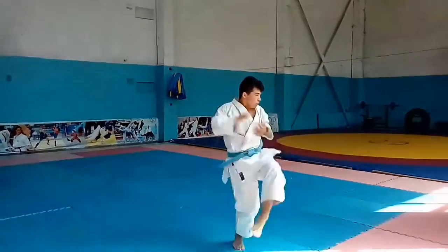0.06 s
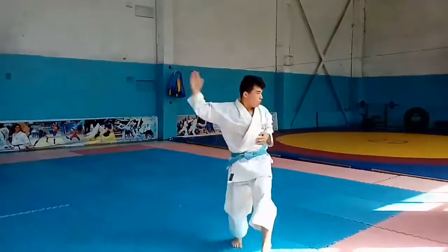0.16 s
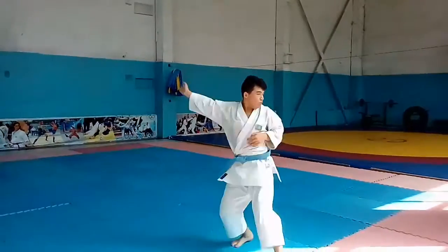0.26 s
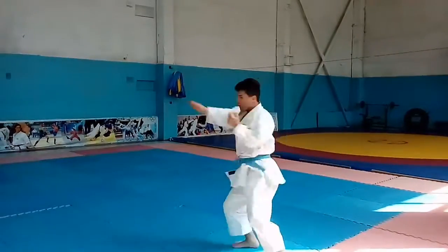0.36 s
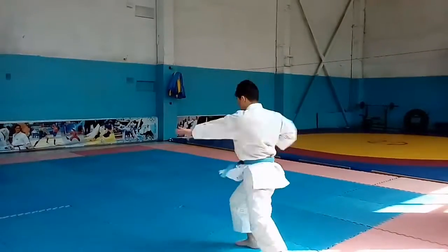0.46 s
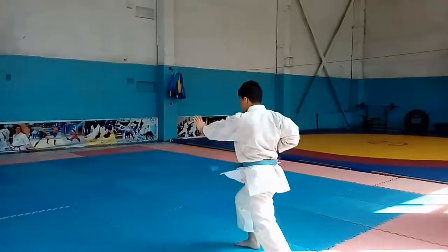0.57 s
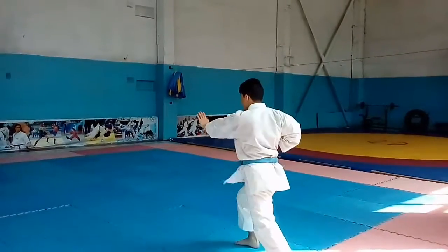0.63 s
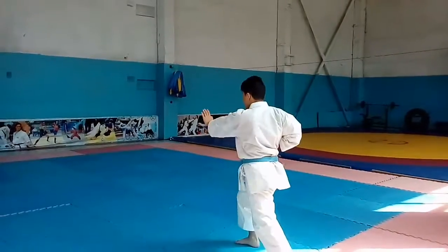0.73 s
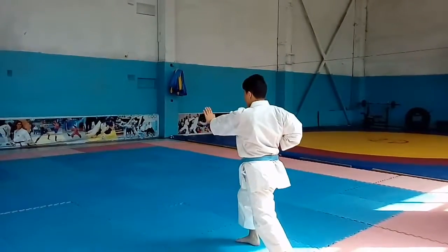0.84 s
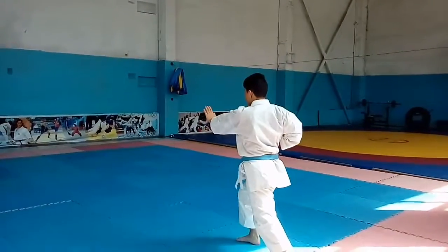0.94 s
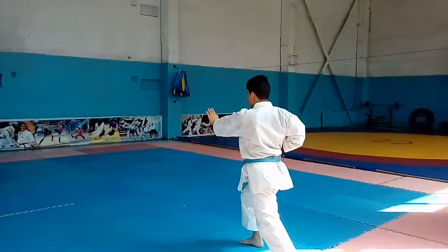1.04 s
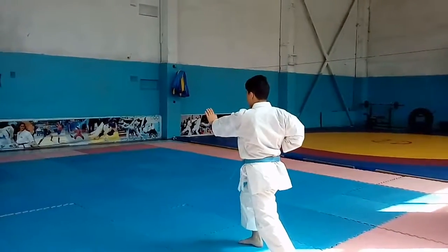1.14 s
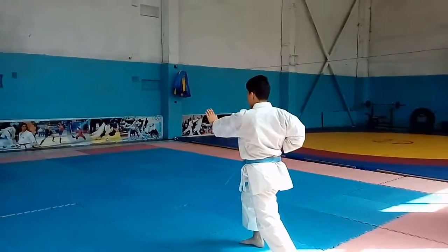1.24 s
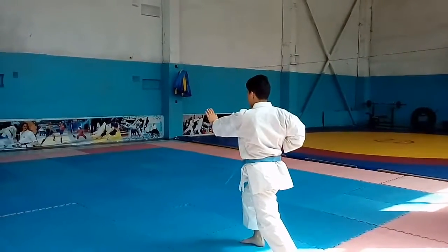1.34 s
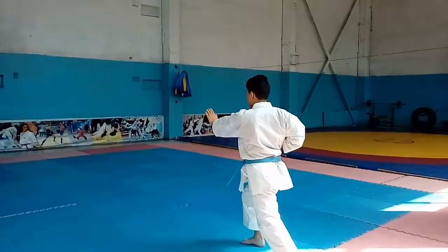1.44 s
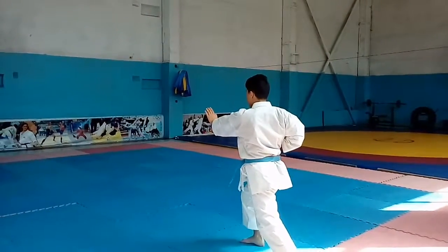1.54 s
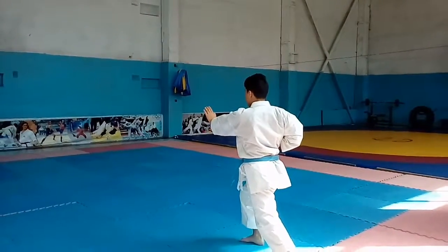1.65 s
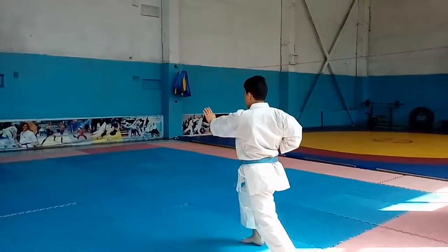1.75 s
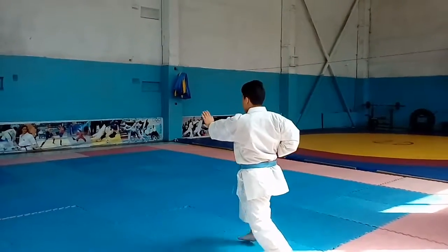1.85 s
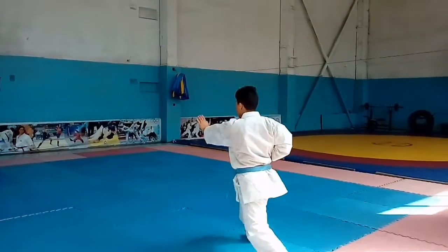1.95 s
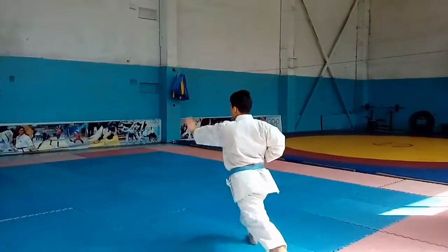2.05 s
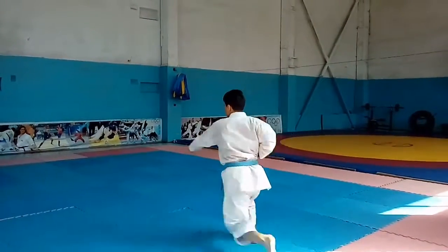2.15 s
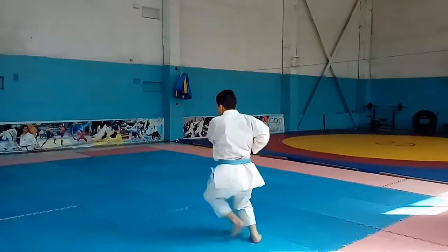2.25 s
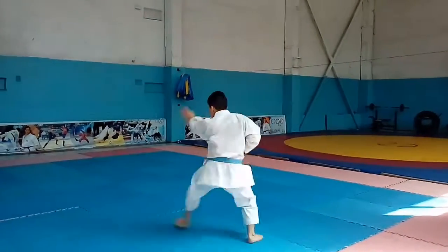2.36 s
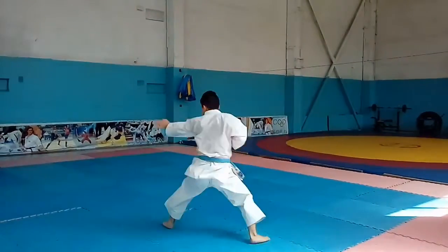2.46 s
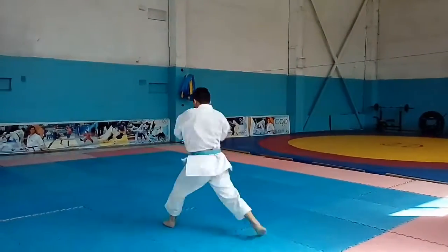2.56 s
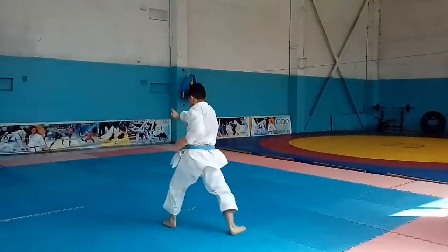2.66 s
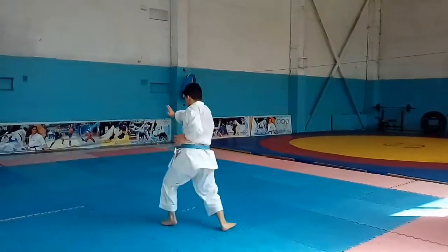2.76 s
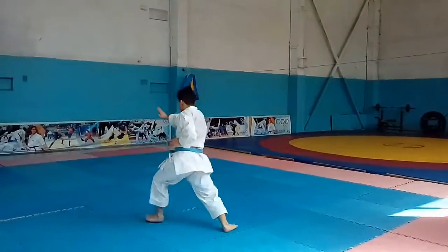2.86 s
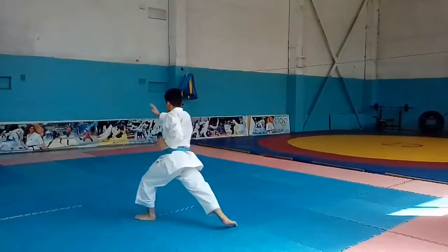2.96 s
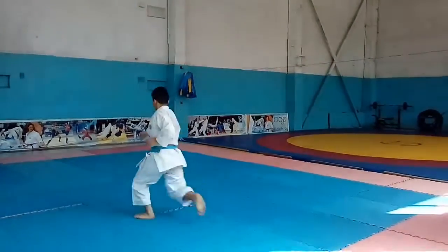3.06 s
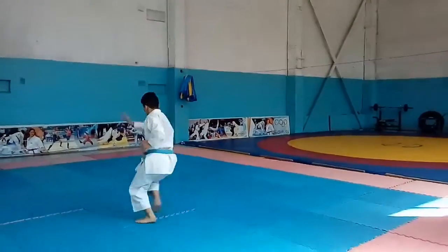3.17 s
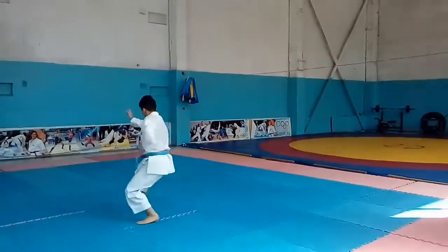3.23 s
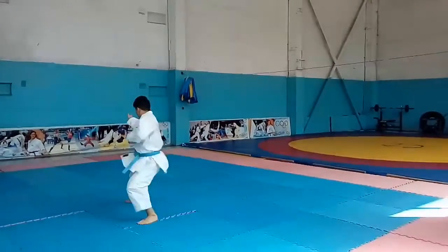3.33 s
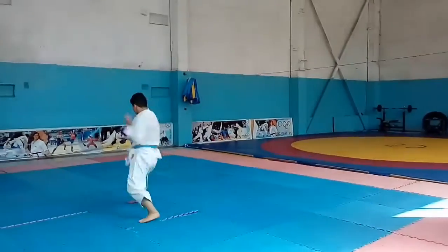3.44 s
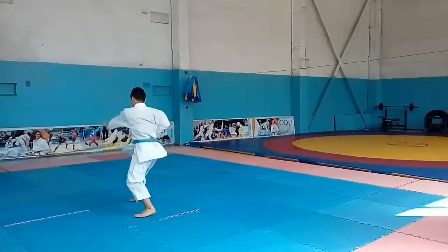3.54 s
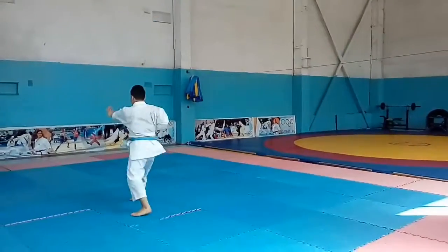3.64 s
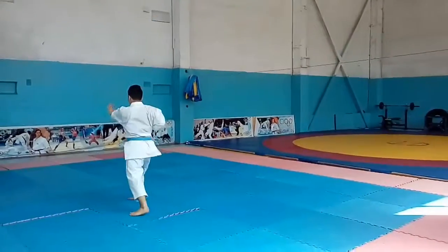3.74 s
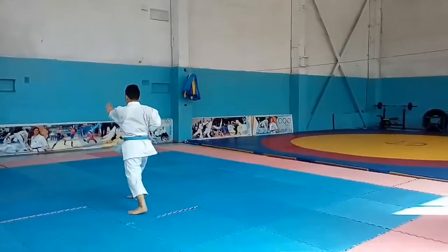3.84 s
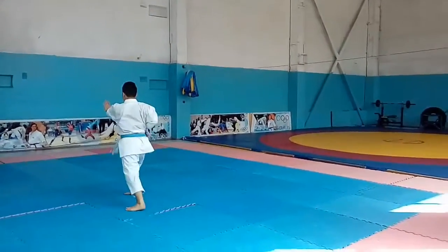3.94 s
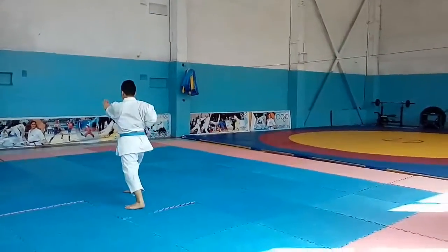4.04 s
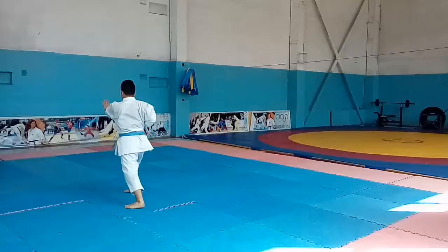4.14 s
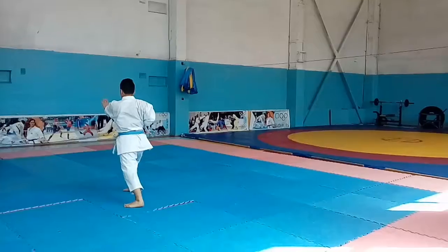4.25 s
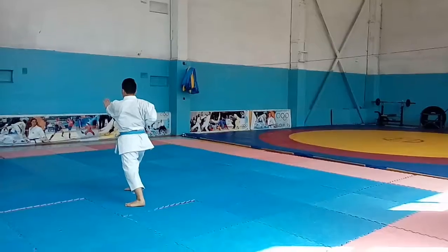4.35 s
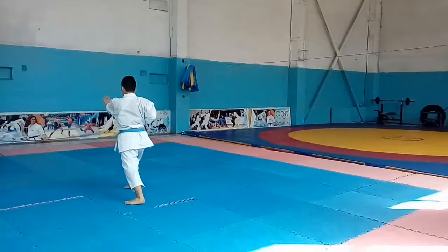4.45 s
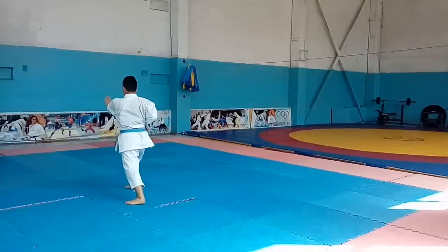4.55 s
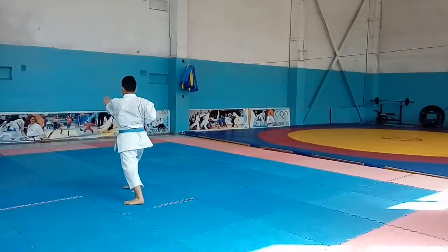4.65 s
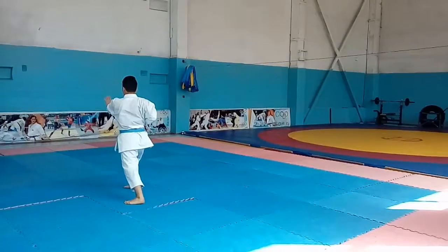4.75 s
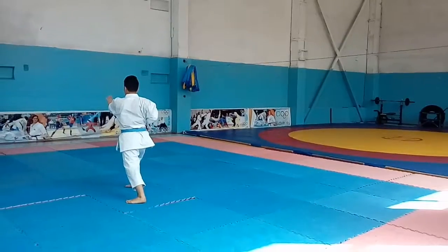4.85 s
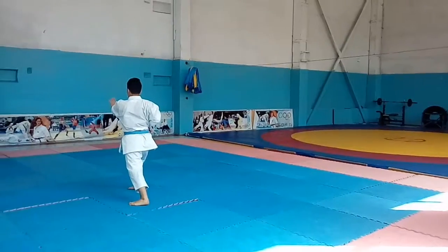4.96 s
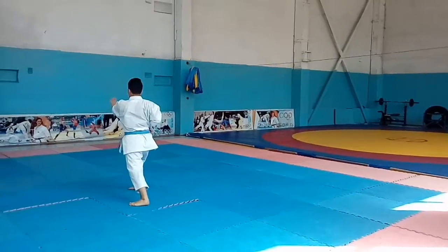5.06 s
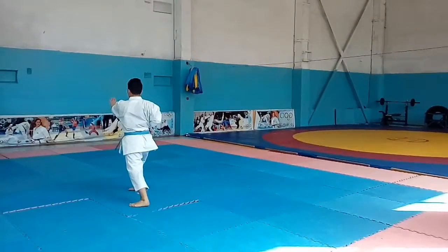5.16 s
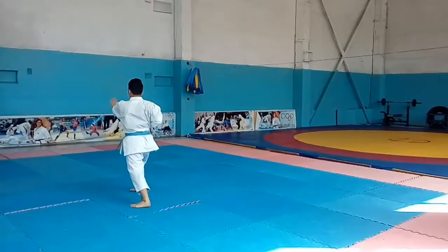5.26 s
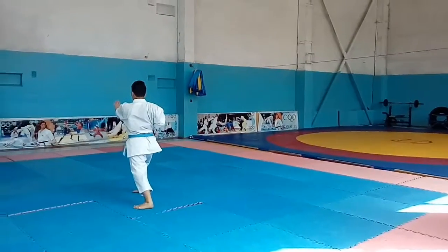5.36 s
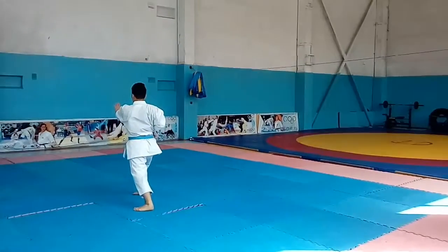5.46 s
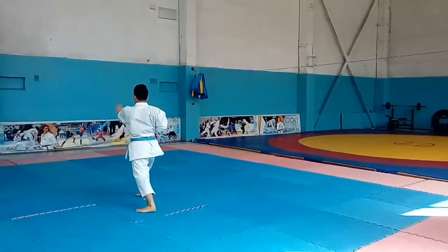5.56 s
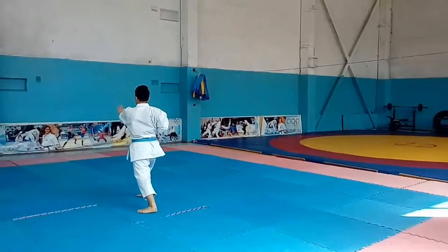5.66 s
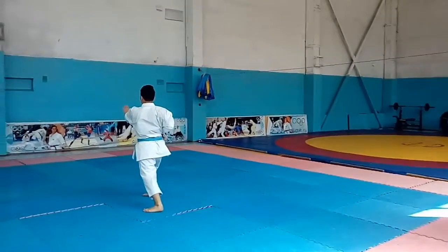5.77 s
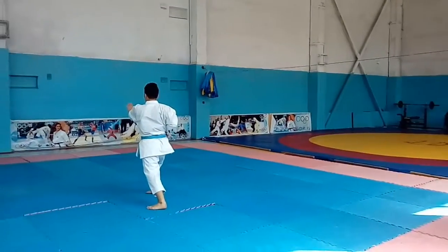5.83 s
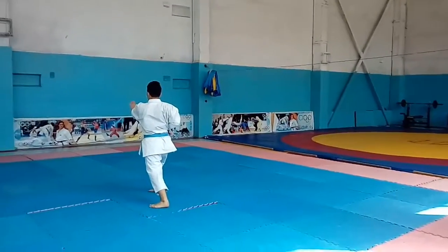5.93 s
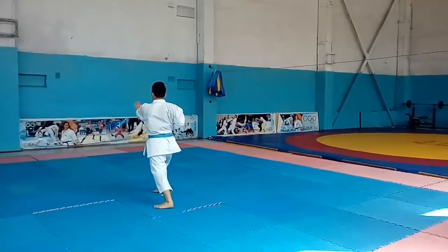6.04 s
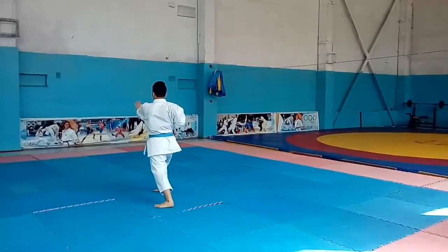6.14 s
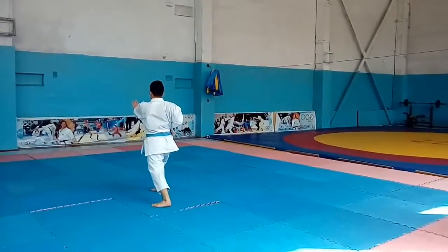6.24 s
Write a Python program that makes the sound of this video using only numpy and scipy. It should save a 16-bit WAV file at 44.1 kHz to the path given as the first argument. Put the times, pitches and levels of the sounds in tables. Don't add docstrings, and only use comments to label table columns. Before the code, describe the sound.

Rapid swishes and sharp fabric snaps, hollow air pops from sleeves and soft booming thuds of bare feet on a sprung mat floor come in three bursts, separated by stillness. Far walls answer every snap after a tiny gap with a tail of a couple of seconds. The ending is nearly quiet, with dry cloth whispers and faint creaks, heard through a small, bass-thin, gently hissing microphone some metres off.

```python
import sys
import numpy as np
from scipy import signal
from scipy.fft import rfft, irfft, next_fast_len
from scipy.io import wavfile
from scipy.ndimage import uniform_filter1d

SR = 44100
rng = np.random.default_rng(int(sys.argv[2]) if len(sys.argv) > 2 else 0)


def put_to_file(sound):
    columns = np.atleast_2d(sound).T
    safe = np.clip(columns, -1, 1)
    whole_steps = np.round(safe * 32767)
    wavfile.write(sys.argv[1], SR, whole_steps.astype(np.int16))


def magnitude_from_level(level_db):
    exponent = np.asarray(level_db, float) / 20
    return 10 ** exponent


N = 277830
LEAD = SR // 2


def evened(x):
    return x / np.sqrt(np.mean(x ** 2) + 1e-20)


def read(points, hz):
    f, value = np.transpose(points)
    return np.interp(np.log(hz + 1), np.log(f + 1), value)


def add(mix, s, sound):
    part = mix[round(s * SR) + LEAD:][:len(sound)]
    part += sound[:len(part)]


def coloured(x, gain_db):
    size = next_fast_len(len(x) + 4096)
    hz = np.fft.rfftfreq(size, 1 / SR)
    return irfft(rfft(x, size) * magnitude_from_level(gain_db(hz)), size)[:len(x)]


def resonate(x, hz, width_hz):
    return signal.lfilter(*signal.iirpeak(hz, hz / width_hz, SR), x)


def glide(x, hz, width_hz):
    turn = np.exp(2j * np.pi * np.cumsum(hz) / SR)
    r = np.exp(-np.pi * width_hz / SR)
    return 2 * (turn * signal.lfilter([1 - r], [1, -r], x / turn)).real


def ring(db, hz, rise_ms, t60):
    t = np.arange(2 * SR) / SR
    envelope = magnitude_from_level(db - 60 * t / t60) * (1 - np.exp(-(1000 * t / rise_ms) ** 2))
    return envelope * np.sin(2 * np.pi * hz * t)


def crackle(count, per_s=5000, spread_db=4):
    size = magnitude_from_level(spread_db * np.minimum(rng.exponential(1, count), 4)) * rng.standard_normal(count)
    clicks = size * (rng.random(count) < per_s / SR)
    return evened(clicks + 0.38 * rng.standard_normal(count))


def strokes(rows, size):
    drop_db = 20
    t = (np.arange(0, size, 16) - LEAD) / SR
    power = []
    for s, db, rise_s, fall_s, *_ in rows:
        away = np.maximum((s - t) / rise_s, (t - s) / fall_s)
        power.append(magnitude_from_level(db - drop_db * away) ** 2)
    return np.repeat(power, 16, axis=1)[:, :size]


def hiss():
    # hz, level_db
    noise_curve = [(25, -9.5), (60, -4), (140, -19), (205, -21.5), (250, -11.5), (330, -16), (560, -1.5),
                   (1200, -4.5), (1800, -4.5), (6500, -11), (8300, -24), (13500, -25.5), (14600, -15.5),
                   (15600, -14)]
    level_db = -65.5
    return magnitude_from_level(level_db) * evened(coloured(rng.standard_normal(N), lambda hz: read(noise_curve, hz)))


def hall(x, gap_s=0.016, swell_s=0.018):
    # hz, t60_s
    decay_times = [(250, 2.13), (420, 1.8), (600, 2.78), (850, 2.58), (1150, 1.92), (1600, 2.63),
                   (2500, 2.58), (3300, 2.17), (4700, 2.045), (7200, 1.396), (8200, 0.96), (10000, 0.8),
                   (14000, 0.67)]
    # delay_s, level_db above the scatter
    wall_echoes = [(.03, 1.5), (0.044, 5), (0.063, 2.5), (.101, 1)]
    hz, t, z = signal.stft(rng.standard_normal(3 * SR), SR, nperseg=512)
    decay = magnitude_from_level(-60 * t / read(decay_times, hz)[:, None])
    tail = signal.istft(z * decay, SR, nperseg=512)[1]
    t = np.arange(len(tail)) / SR
    tail *= 1 - np.exp(-np.maximum(t - gap_s, 0) / swell_s)
    tail *= magnitude_from_level(sum(db * np.exp(-.5 * ((t - delay) / 0.0034) ** 2) for delay, db in wall_echoes))
    return signal.fftconvolve(x, tail / np.linalg.norm(tail))[:len(x)]


def settle(size):
    # peak_s, level_db, rise_s, fall_s
    sags = [
        (4.6, -56, 0.046, 0.32),
        (4.94, -51, 0.16, 0.21),
        (5.2, -58.5, 0.95, 0.46),
        (5.72, -54.5, 0.057, 0.091),
    ]
    fibres = crackle(count=size, per_s=9300, spread_db=4.0)
    folds = resonate(fibres, 1100, 400)
    folds = folds + 0.61 * resonate(fibres, 1690, 1000)
    folds = folds + 0.37 * resonate(fibres, 4060, 2200)
    return np.sqrt(strokes(sags, size).sum(0)) * evened(folds)


def fold_noise(length_s, hz, width_hz, db, spread_db=5.0, soft=0.34):
    fibres = crackle(count=SR // 2, per_s=6000, spread_db=spread_db)[:round(length_s * SR)]
    fold = resonate(resonate(fibres, hz, width_hz), hz, 2 * width_hz)
    return magnitude_from_level(db) * evened(fold) * signal.windows.tukey(len(fibres), min(soft, 1))


def murmurs(direct):
    # start_s, length_s, pitch_hz, width_hz, level_db
    murmur_events = [(1.24, 0.26, 8350, 1000, -65), (1.426, 0.44, 238, 44.6, -58.5),
                     (4.618, 0.48, 600, 90, -66.5), (5.08, 0.25, 324, 90, -72.5),
                     (5.121, .14, 1050, 150, -65.5), (4.578, 0.42, 5900, 2500, -63),
                     (4.7, 0.4, 6300, 500, -72), (5.022, 0.33, 3400, 900, -68.5), (4.9, 0.2, 1220, 400, -66),
                     (5.02, 0.23, 590, 70, -60), (5.08, 0.32, 2250, 700, -66), (5.2, 0.24, 5840, 506, -74.5),
                     (5.68, 0.089, 1880, 160, -71), (5.69, 0.18, 3200, 250, -71),
                     (6.1, 0.19, 5400, 303, -75)]
    for s, *fold in murmur_events:
        add(direct, s, fold_noise(*fold))


def swishes(direct):
    # start_s, length_s, pitch_hz, width_hz,
    # level_db
    swish_events = [(.49, 0.37, 9300, 3000, -35), (1.9, 0.14, 5500, 1200, -49),
                    (2.1, 0.065, 6000, 1500, -44), (2.13, 0.084, 3300, 500, -45),
                    (2.17, 0.02, 1500, 900, -42.5), (2.23, 0.07, 5540, 1400, -37),
                    (2.22, 0.046, 3300, 600, -41), (2.23, 0.13, 14800, 2500, -29.5),
                    (2.26, 0.07, 11500, 4000, -32.5), (2.5, 0.12, 5740, 1500, -41),
                    (2.51, 0.11, 3300, 800, -41.5), (2.63, 0.032, 5500, 1200, -37),
                    (2.8, 0.14, 13100, 4000, -29.5), (3.155, 0.037, 14000, 6000, -35.5),
                    (3.41, 0.036, 6500, 1500, -40), (3.749, 0.039, 1530, 60.3, -30.5),
                    (2.289, 0.031, 950, 300, -38), (0.164, 0.023, 12500, 6000, -20.5),
                    (.5, 0.24, 14500, 3000, -30.5), (1.89, .14, 9500, 3000, -54),
                    (2.1, 0.11, 9500, 3000, -50), (2.69, 0.057, 5800, 1500, -37.5),
                    (2.73, 0.018, 6500, 2500, -42), (3.68, 0.18, 13000, 5000, -33.5)]
    for s, *fold in swish_events:
        add(direct, s, fold_noise(*fold, spread_db=1.5, soft=0.56))


def rub(size):
    # fastest_s, level_db, rise_s, fall_s, dull_share_db
    limb_strokes = [(0.0, -50.5, 0.045, 0.18, -6.5), (0.118, -44, 0.077, 0.029, -3.5),
                    (0.18, -34, 0.013, 0.0038, -10.5), (.214, -52.5, 0.01, 0.23, 13),
                    (0.412, -51.5, 0.032, 0.13, 8.5), (0.611, -42.5, 0.27, 0.018, 1),
                    (1.915, -70, 0.034, 0.12, -10.5), (1.97, -56.5, 0.042, 0.074, -20),
                    (2.142, -48.5, 0.066, .15, -4.5), (2.278, -48, 0.098, 0.13, -9.5),
                    (2.527, -52, 0.16, 0.42, 0), (2.64, -49, 0.02, 0.039, -2.5),
                    (2.72, -55.5, 0.045, 0.12, 4.5), (2.742, -50, .03, 0.029, 14),
                    (2.84, -42, 0.11, 0.36, 1), (3.201, -60, .3, 0.28, 3), (3.424, -55.5, 0.041, 0.16, 7.5),
                    (3.4, -64.5, 0.29, .05, -13.5), (3.501, -46, 0.0097, 0.016, -16.5),
                    (3.598, -51, 0.34, 0.5, 4), (3.712, -44.5, 0.054, 0.023, -8)]
    weave_hz, weave_oct_per_db = 4840, 0.24
    top_db, top_per_db = -5, 0.2
    power = strokes(limb_strokes, size)
    level = np.sqrt(power.sum(0))
    dull = np.sqrt(magnitude_from_level(np.array(limb_strokes)[:, 4]) ** 2 @ power)
    speed_db = np.clip(20 * np.log10(level + 1e-9) + 50, -15, 15)
    clumps = magnitude_from_level(0.63 * evened(uniform_filter1d(rng.standard_normal(size), size=500)))
    fibres = clumps * crackle(count=size, per_s=11000, spread_db=3.0)
    weave = evened(glide(fibres, weave_hz * 2 ** (weave_oct_per_db * speed_db), 2200))
    bright = weave + 1.48 * evened(resonate(fibres, 7400, 4600))
    top = evened(resonate(resonate(fibres, 14500, 6000), 14500, 6000))
    slack_fibres = crackle(count=size, per_s=4100, spread_db=3.5)
    flap = evened(resonate(resonate(slack_fibres, 900, 1400), 1100, 2600))
    return magnitude_from_level(9.5) * (level * (bright + magnitude_from_level(top_db + top_per_db * speed_db) * top) + dull * flap)


def stamps(size):
    # start_s, weight_db, pitch_hz stirred most, t60_s of the boom
    landings = [(-.2, -47, 110, 1.8), (0.199, -52, 125, 2.2), (0.421, -41.5, 117.3, 0.4),
                (0.629, -52, 94, 2.6), (2.121, -63.5, 108.8, 1.9), (2.291, -59, 121.3, 3.4),
                (2.59, -47, 65, 3.3), (2.739, -46, 89, 0.53), (2.831, -43, 75, 1), (3.064, -52.5, 75, 2.8),
                (3.482, -48, 109, 1.9), (3.697, -52, 60.4, 2.44), (5.1, -73.5, 119, 0.45)]
    # pitch_hz, width_hz, level_db
    floor_modes = [(30, 8.7, -8.5), (50, 7, -1), (63, 7.3, -9), (75, 12, -3.5), (98, 25, -7),
                   (123.5, 34, -10.5), (156.6, 10, -7), (269, 65, -3.5)]
    pushes = np.zeros((len(floor_modes), size))
    t = np.arange(2 * SR) / SR
    for s, db, hz, t60 in landings:
        early = magnitude_from_level(-60 * t / t60) * (0.98 + 0.62 * np.exp(-t / 0.046))
        late = magnitude_from_level(-25.0 - 60 * t / 2.4)
        boom = rng.standard_normal(len(t)) * np.sqrt(early ** 2 + late ** 2)
        boom *= (1 - np.exp(-t / 0.013)) * (1 - (t / 2) ** 4)
        for push, (f, w, g) in zip(pushes, floor_modes):
            detuning_oct = abs(np.log2(f / hz))
            add(push, s, magnitude_from_level(db + 33.0 + g - 10.0 * detuning_oct) * boom)
    return sum(resonate(resonate(push, f, w), f, 3 * w) for push, (f, w, g) in zip(pushes, floor_modes))


def thuds(floor):
    # start_s, level_db, pitch_hz, rise_ms, t60_s
    panel_rings = [(.02, -43.5, 75, 10, .2), (.07, -47.5, 125, 8.6, .15), (.415, -23, 125, 13, .25),
                   (.42, -28, 72, 16, .3), (.52, -31, 85, 15, .25), (0.681, -41.5, 130, 15, .2),
                   (1.02, -49.5, 70, 16, .3), (1.45, -53, 75, 38, .3), (2.125, -44, 60, 4, .12),
                   (2.281, -40, 124, 15, .25), (2.6, -41, 65, 20, .5), (2.735, -29, 95, 10, .2),
                   (2.739, -33.5, 135, 10, .15), (2.825, -28, 73, 12, .7), (3.039, -32.5, 76, 20, 1.2),
                   (3.34, -34, 58, 19, .5), (3.491, -40, 135, 13, .25), (3.531, -36.5, 78, 13, .4)]
    for s, *mode in panel_rings:
        add(floor, s, ring(*mode))


def pockets(direct):
    # start_s, level_db, pitch_hz, rise_ms, t60_s
    bursts = [(.579, -20, 760, 1.8, 0.018), (.59, -11, 860, 2.2, 0.035), (2.628, -23.5, 900, 2, 0.037),
              (2.9, -22, 2600, .8, 0.018), (4, -20.5, 4600, .8, .02), (2.742, -25, 1400, 1.6, .04),
              (2.736, -26, 610, 3, 0.036), (2.741, -14, 700, 2.5, .04), (2.747, -13.5, 760, 2, 0.049),
              (3.667, -22.5, 1300, 3.3, 0.048), (3.679, -2.5, 700, 2.1, .018),
              (2.177, -23, 970, 5.1, 0.037), (2.305, -29, 1900, 1.5, 0.02)]
    for s, *mode in bursts:
        add(direct, s, ring(*mode))


def sings(sent):
    # start_s, level_db, pitch_hz, rise_ms, t60_s
    taut_modes = [(3.7, -27, 1617, 8, .2), (3.7, -26, 1662, 8, .2), (3.7, -31, 2003, 8, .15),
                  (3.7, -30, 580, 8, .12), (3.7, -33, 4560, 5, .08), (2.75, -29, 575, 8, .12),
                  (2.75, -29, 765, 8, .1), (.6, -30, 4750, 5, .03), (.6, -29, 1500, 5, .05),
                  (.6, -29, 600, 5, .08)]
    for s, *mode in taut_modes:
        add(sent[1], s, ring(*mode))


def snap(pop_db, pop_hz, crackle_db, ms, drive):
    pop = resonate(resonate(drive[0], pop_hz, 480), pop_hz, 800)
    pop = pop + 0.28 * resonate(drive[0], 1.9 * pop_hz, 1200)

    def crack_db(hz):
        rise = 16.7 * np.log2(np.minimum(hz, 3000) / 3000 + .01)
        return rise - 7 * np.log2(np.maximum(hz / 6500, 1))
    crack = coloured(drive[1], crack_db)
    pop = magnitude_from_level(pop_db - 8) * pop / np.linalg.norm(pop)
    crack = magnitude_from_level(crackle_db - 9.5) * crack / np.linalg.norm(crack)
    return np.sqrt(ms / 1000 * SR) * (pop + crack)


def snaps(direct, sent):
    # start_s, pop_db, pop_hz, crackle_db, hall_db (share sent to the walls)
    flicks = [(.051, -32, 760, -20.5, 7.5), (.183, -11, 670, -8, -5), (.283, -16.5, 740, -45, -4.5),
              (.578, -27, 774, -37.5, 6), (2.144, -29, 1550, -23, -15), (2.744, -16, 1970, -25, -13),
              (2.307, -24.5, 1200, -45, -4), (2.629, -26, 1100, -25.5, -3.5), (2.782, -19.5, 724, -32.5, 4),
              (3.717, -14.5, 2000, -24, -13.5), (4.526, -35, 634, -59, -13), (5.082, -66, 1500, -62, -16)]
    taps = [(0.144, -26.5, 573, -18, -6.5), (.412, -15.5, 667, -20.5, -8.5),
            (1.906, -60.5, 1640, -45.5, 0.5), (1.984, -42, 1460, -25.5, -2.5),
            (2.304, -24.5, 2240, -24.5, -13.5), (2.59, -30, 740, -23.5, 5), (2.712, -34.5, 775, -32, 18),
            (2.742, -22, 740, -24, -2), (2.833, -20.5, 1150, -14.5, 2), (3.17, -26, 855, -34, 0.5),
            (3.498, -27, 720, -25.5, 8), (3.68, -20, 750, -15.5, 1), (5.255, -77, 1500, -71, -11)]
    tears = [(.1, -20.5, 700, -25, -5.5), (.17, -19, 740, -11, -5), (.415, -25, 640, -24, -11),
             (.525, -33, 724, -27, -4), (.59, -20.5, 860, -15, -12.5), (1.947, -54, 1540, -34, -11),
             (2.175, -36.5, 910, -29, 7), (2.63, -31.5, 729, -35.5, -7), (2.745, -18, 799, -31, -2),
             (3.425, -47.5, 1850, -26.5, 3.5), (3.661, -23.5, 1130, -35.5, 8)]
    events = [(ms, *row) for ms, rows in ((4, flicks), (8.4, taps), (15.4, tears)) for row in rows]
    for k, (ms, s, pop_db, pop_hz, crackle_db, hall_db) in enumerate(events):
        t = np.arange(2048) / (SR * ms / 1000)
        shape = np.sin(np.pi * np.minimum(t, 1) ** 0.69) + 0.79 * np.exp(-t / 1.3) * (t > .5)
        fibres = [shape * crackle(count=2048, per_s=5100, spread_db=2.5) for _ in range(2)]
        fibres[0][88] += 22 / ms
        fibres[1][88] += 4 / ms
        add(direct, s - .002, snap(pop_db, pop_hz, crackle_db, ms, fibres))
        slap = [signal.unit_impulse(2048, 441)] * 2
        add(sent[k % 3], s - .01, magnitude_from_level(hall_db) * snap(pop_db, pop_hz, crackle_db, ms, slap))


def strike(db, bumps, ripple=0.0061):
    blow = signal.unit_impulse(4096, 512)
    blow[512:1024] += ripple * rng.standard_normal(512)
    blow = coloured(blow, lambda hz: sum(g * np.exp(-.5 * (np.log2((hz + 1) / f) / w) ** 2) for f, w, g in bumps))
    return magnitude_from_level(db + 35.0) * blow / np.linalg.norm(blow)


def strikes(sent):
    # start_s, level_db thrown at the walls
    blows = [
        (-.35, -19),
        (.175, -32),
        (.59, -17.5),
        (2.743, -19.5),
        (3.689, -21),
    ]
    # centre_hz, width_oct, gain_db
    colours = [
        [(400, 0.39, -4.5), (740, .7, 9.5), (1100, 0.1, 5), (1600, .3, -1), (3000, 0.48, -2.5), (6000, .4, 1.5)],
        [(400, 0.36, -9.5), (700, .4, -2.5), (1100, .15, 1.5), (2500, 0.86, 2.5), (4000, .3, 5),
         (6000, 0.23, -22.5)],
        [(405, 0.52, 4), (752, 0.83, 3.2), (1100, 0.12, 2.5), (1500, 0.16, 4.5), (4400, 0.27, 0.59),
         (6790, 0.91, 4.5)],
        [(480, 0.69, 4), (740, .2, -9.5), (1200, 0.52, -4.5), (2000, 0.267, 2), (3300, 0.356, -3.5),
         (6000, 0.52, 3)],
        [(573, 0.18, 7), (1150, 0.14, -12), (1640, 0.032, 6.5), (2220, 0.3, 6.5), (4600, 0.061, 4),
         (6500, 0.1, 1), (10500, 0.47, -3.5), (400, .2, 5)],
    ]
    for k, ((s, db), bumps) in enumerate(zip(blows, colours)):
        add(sent[k % 3], s - 512 / SR, strike(db, bumps))


def radiated(cloth):
    return coloured(cloth, lambda hz: 7 * np.log2(np.minimum(hz / 417, 1) + 0.0076))


def microphone(air):
    # hz, gain_db
    response = [(150, -13), (212, -27.5), (260, -16.5), (340, -8.5), (560, -2.5), (800, -2.5), (1000, -6.5),
                (1500, -2.5), (4000, -6), (6700, -6), (8270, -18), (11500, -28), (13600, -40.5),
                (14800, -36.5)]
    return coloured(air, lambda hz: read(response, hz) + 5)


def scene():
    size = N + LEAD
    floor, direct, sent = magnitude_from_level(11.0) * stamps(size), np.zeros(size), np.zeros((3, size))
    rubbing = rub(size)
    direct += rubbing + settle(size)
    sent[0] += magnitude_from_level(-5.0) * rubbing
    murmurs(direct)
    swishes(direct)
    thuds(floor)
    pockets(direct)
    sings(sent)
    snaps(direct, sent)
    strikes(sent)
    cloth = radiated(direct + sum(hall(x) for x in sent))
    return microphone(floor + cloth)[None, LEAD:]


def roll_off(x):
    return signal.sosfilt(signal.butter(12, 15870, fs=SR, output="sos"), x)


def record(dry):
    # hz, level_db
    gate_curve = [(300, -80.5), (600, -63.5), (850, -69.5), (1150, -73.5), (1600, -78), (2500, -76.5),
                  (3300, -79), (5000, -83.5), (7000, -92), (8500, -96), (10500, -99), (13000, -101),
                  (15000, -104)]
    ceiling = 0.61
    hz, t, z = signal.stft(ceiling * np.tanh(dry[0] / ceiling), SR, nperseg=1024)
    power = uniform_filter1d(uniform_filter1d(abs(z) ** 2, size=14, axis=1), size=5, axis=0)
    power_db = 10 * np.log10(power + 1e-16)
    sink_db = np.clip(read(gate_curve, hz)[:, None] - power_db, 0, 6) * (hz > 300)[:, None]
    patches = uniform_filter1d(rng.standard_normal(z.shape), size=8, axis=1)
    patches = evened(uniform_filter1d(patches, size=6, axis=0))
    noise = signal.stft(hiss(), SR, nperseg=1024)[2] * magnitude_from_level(1.0 * patches)
    mix = signal.istft(z * magnitude_from_level(-2.5 * sink_db) + noise, SR, nperseg=1024)[1][None, :N]
    return roll_off(mix)


dry = scene()
out = record(dry)
put_to_file(out)
```